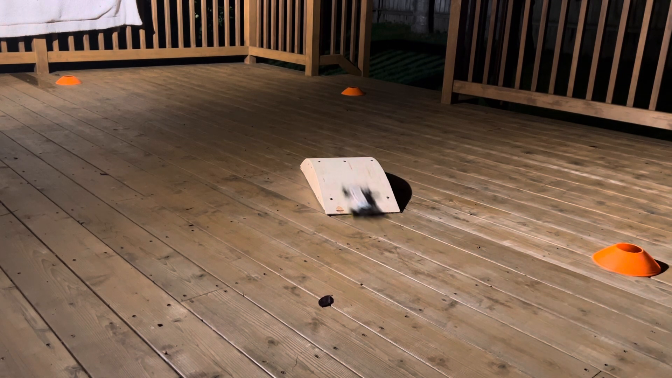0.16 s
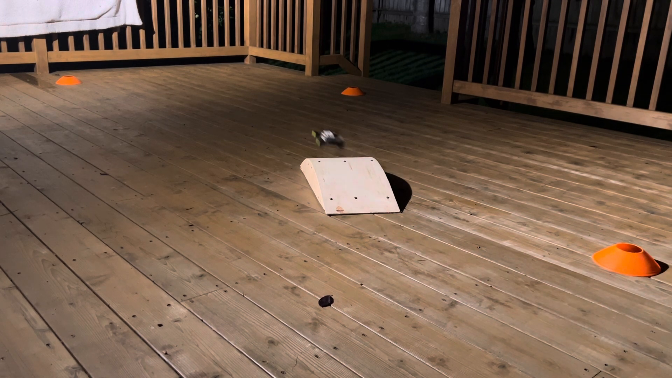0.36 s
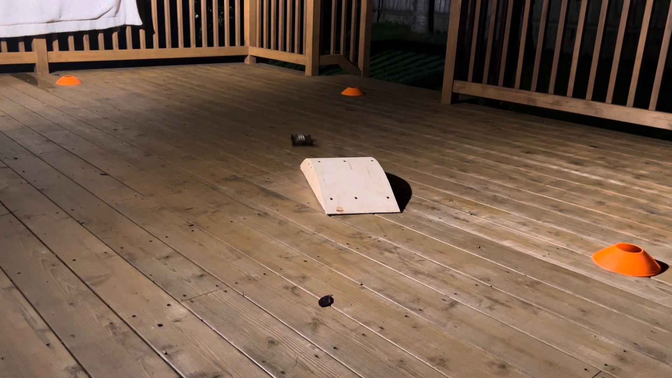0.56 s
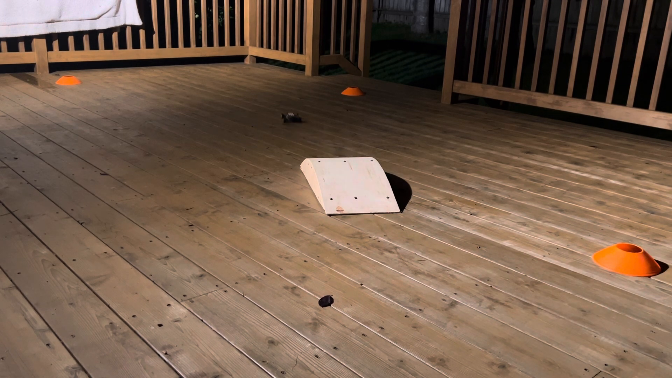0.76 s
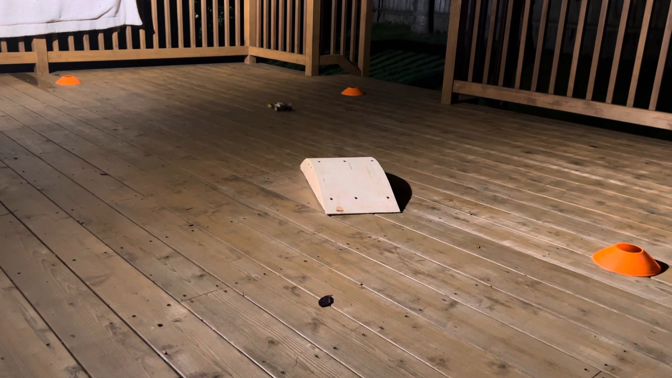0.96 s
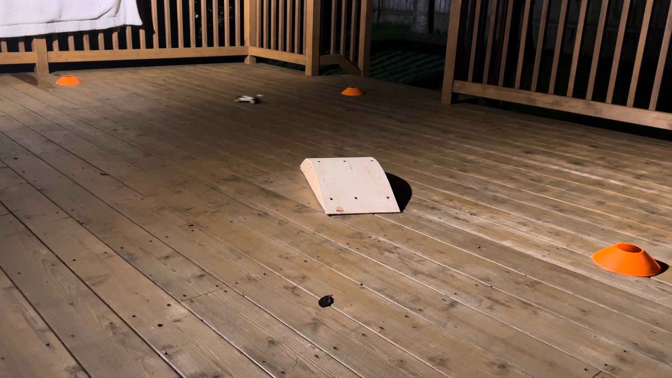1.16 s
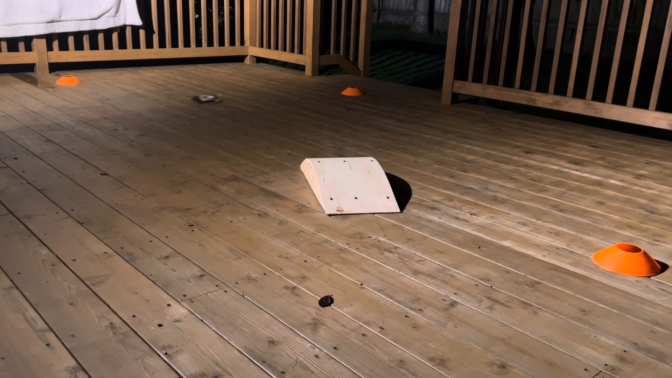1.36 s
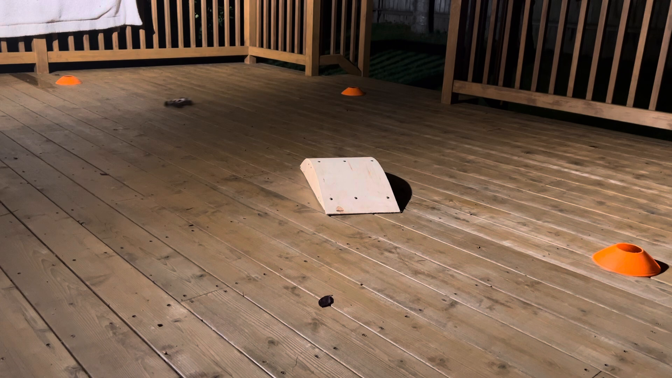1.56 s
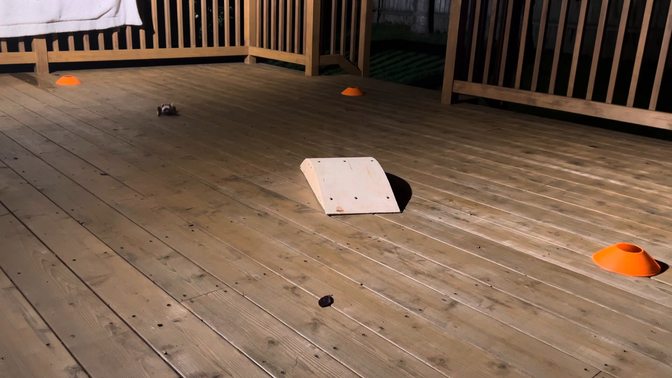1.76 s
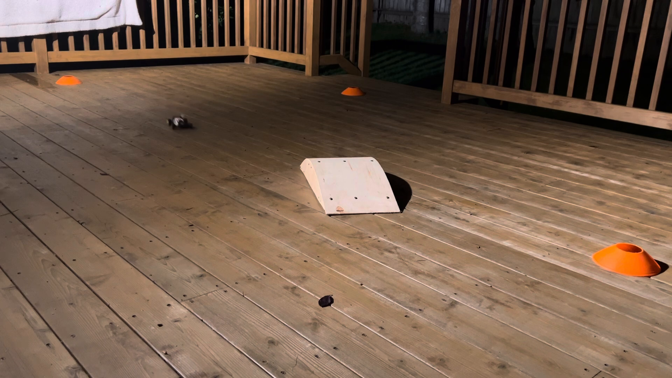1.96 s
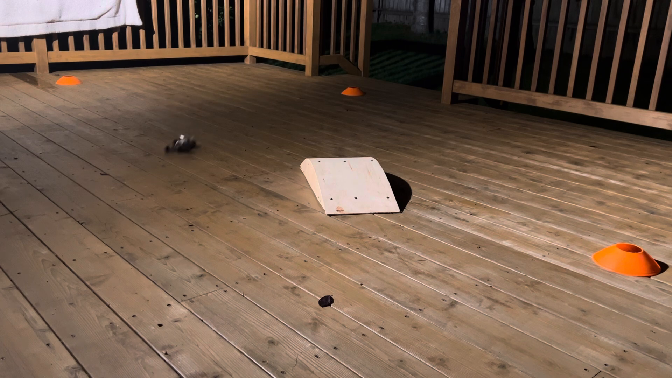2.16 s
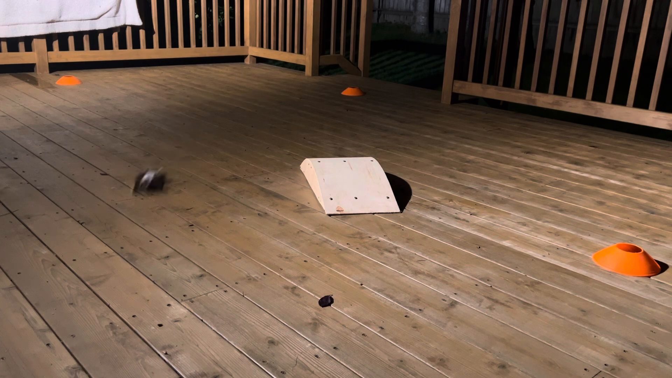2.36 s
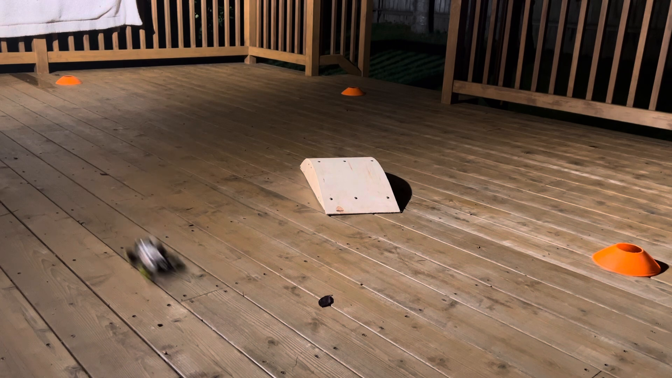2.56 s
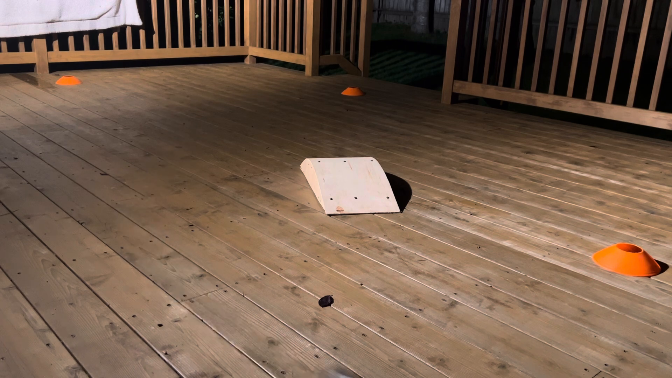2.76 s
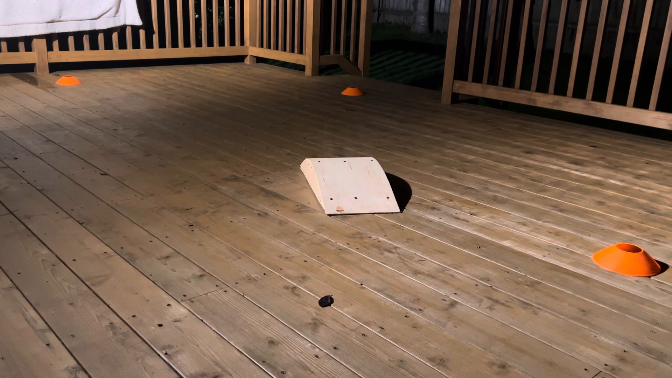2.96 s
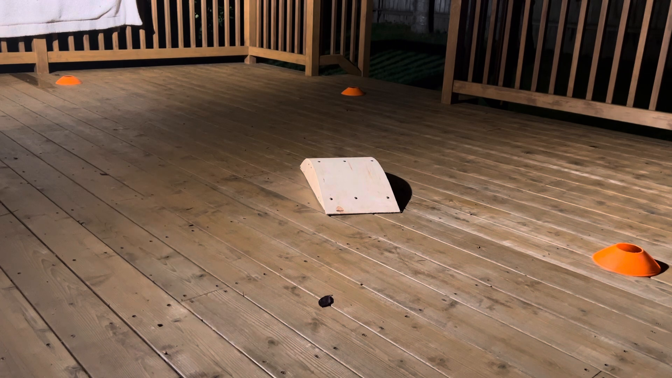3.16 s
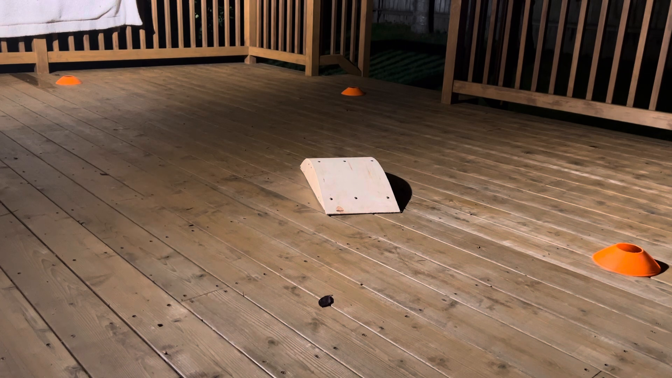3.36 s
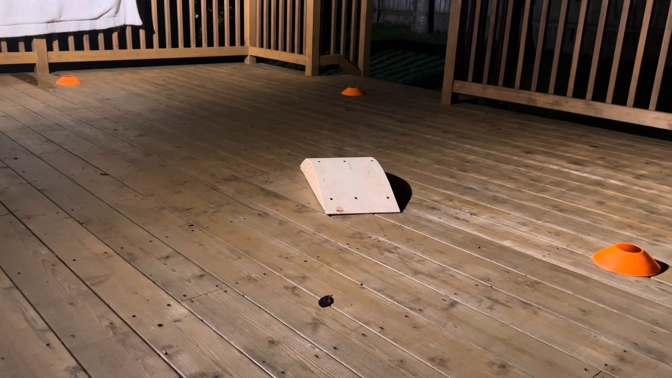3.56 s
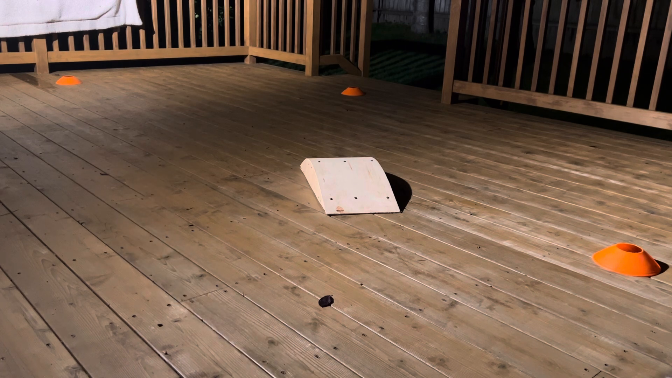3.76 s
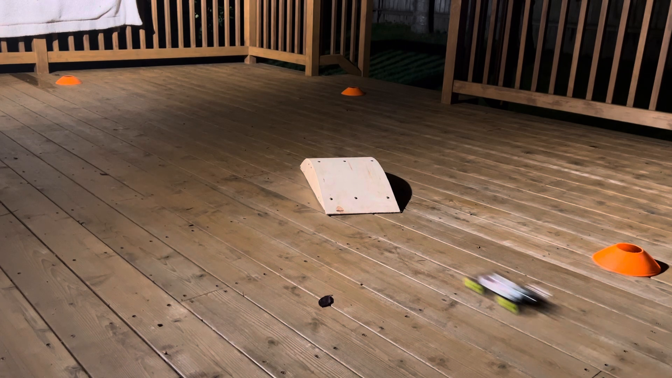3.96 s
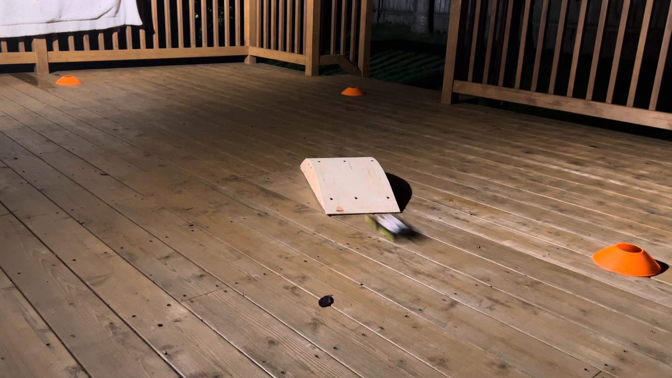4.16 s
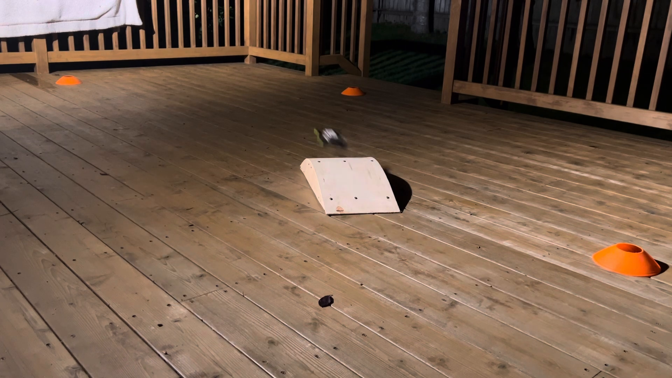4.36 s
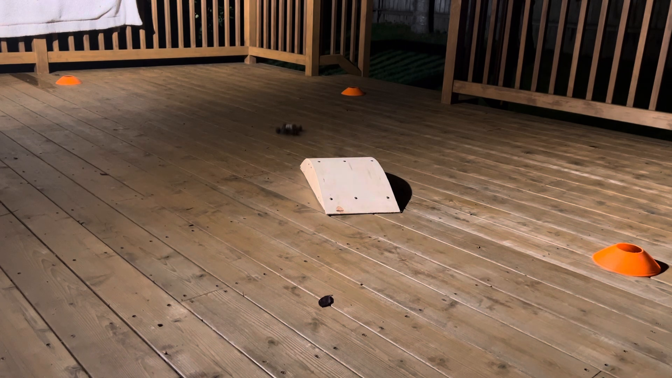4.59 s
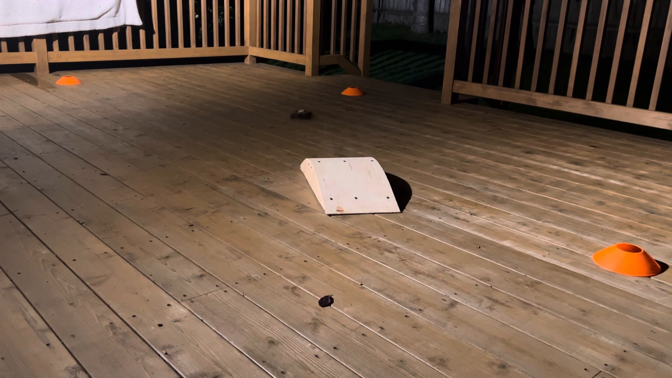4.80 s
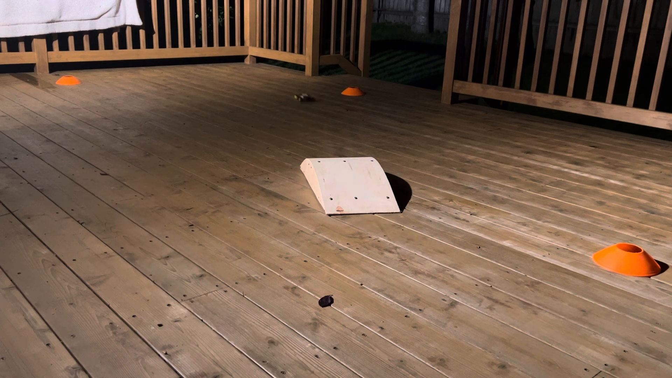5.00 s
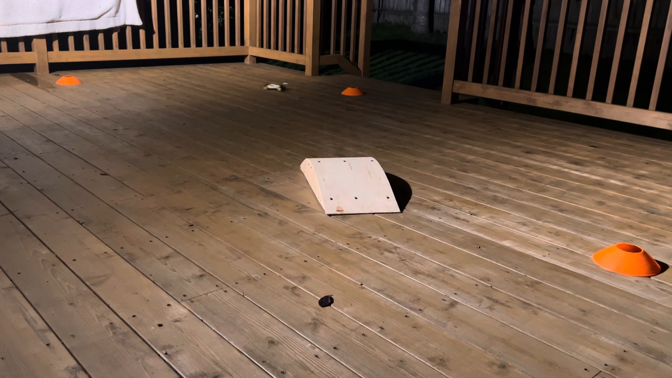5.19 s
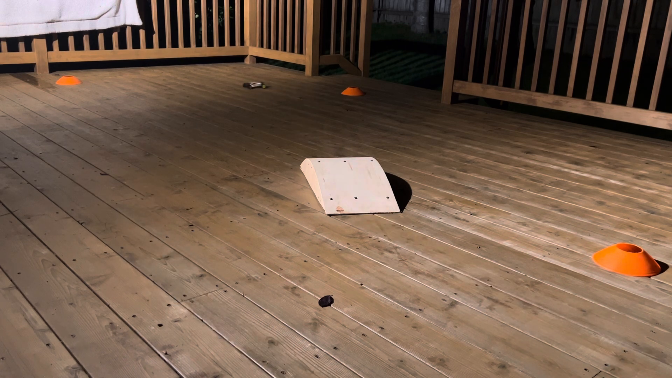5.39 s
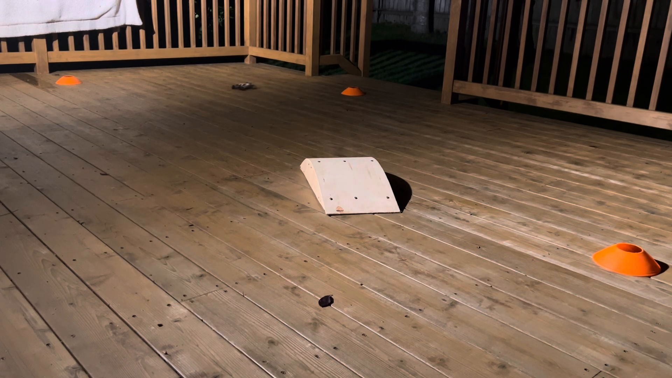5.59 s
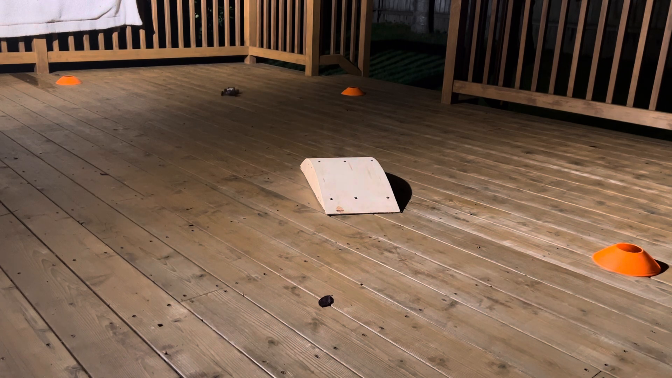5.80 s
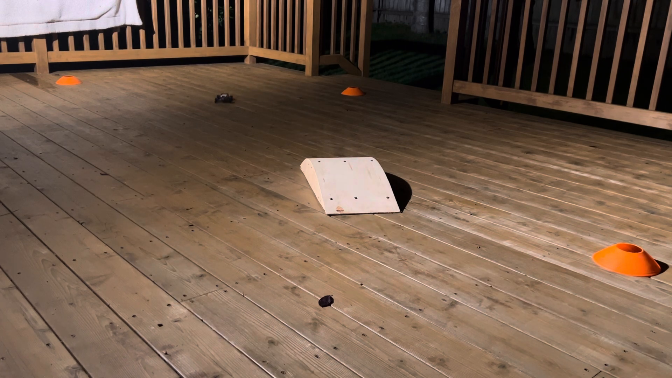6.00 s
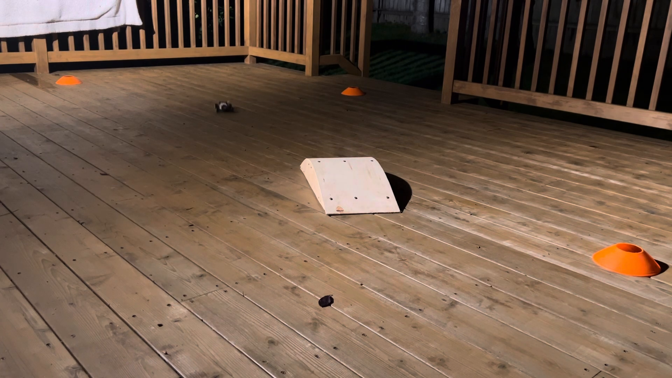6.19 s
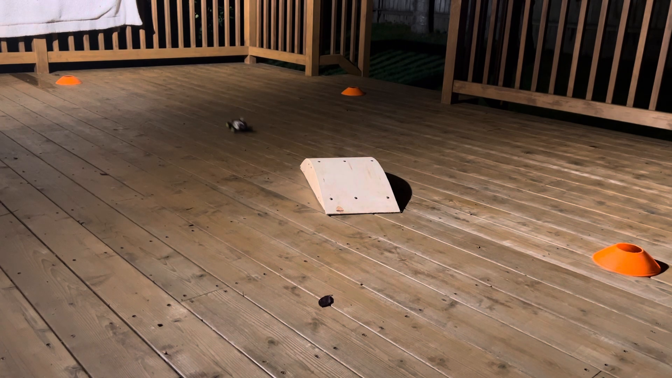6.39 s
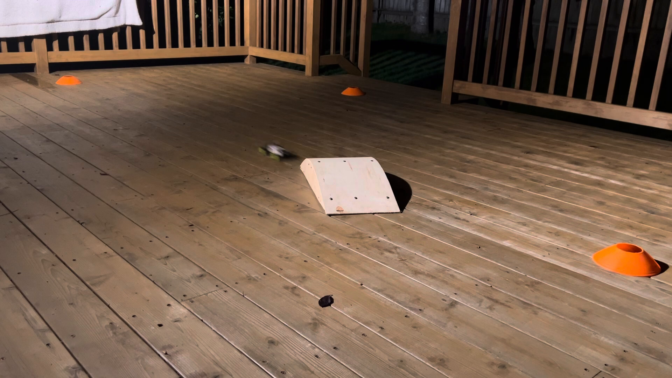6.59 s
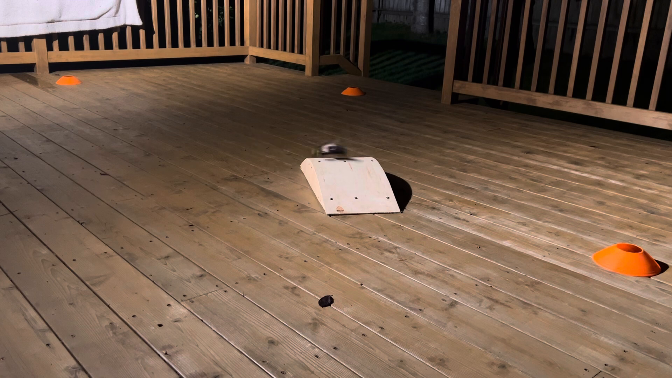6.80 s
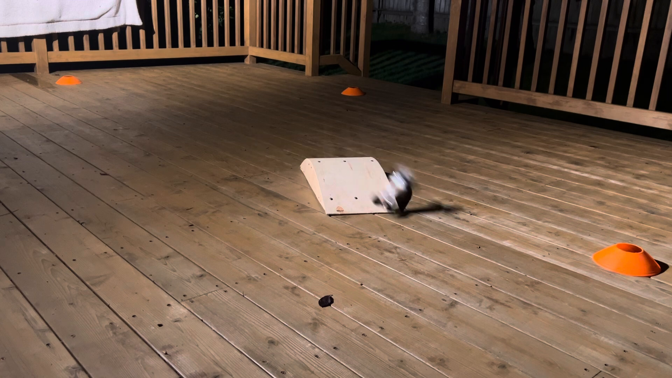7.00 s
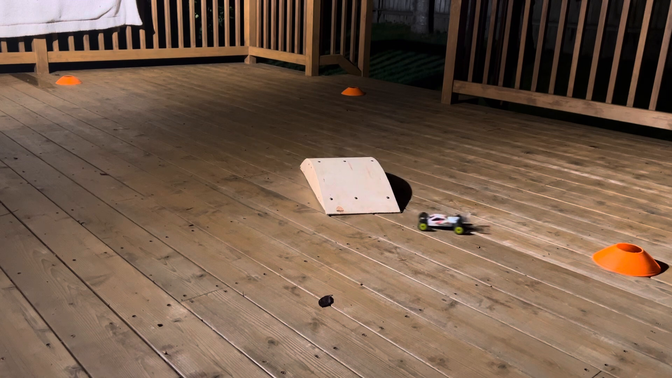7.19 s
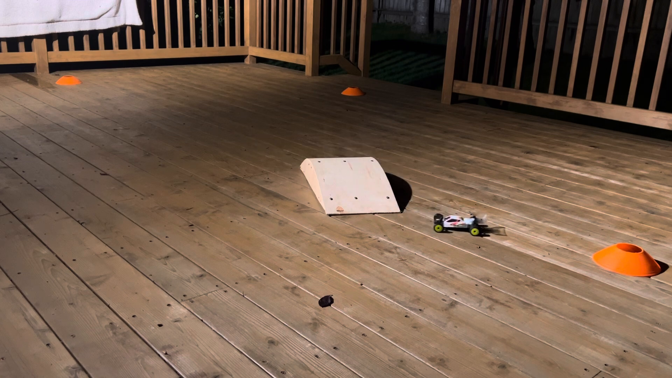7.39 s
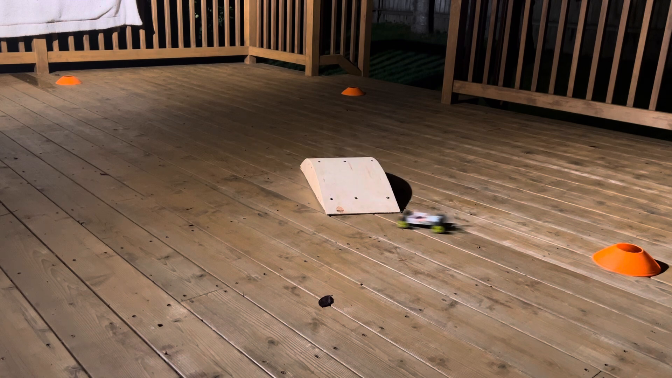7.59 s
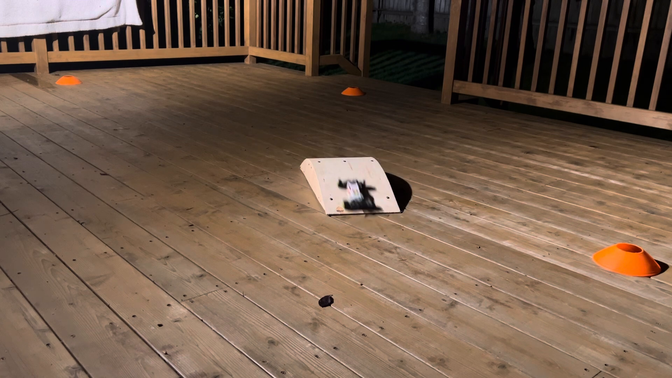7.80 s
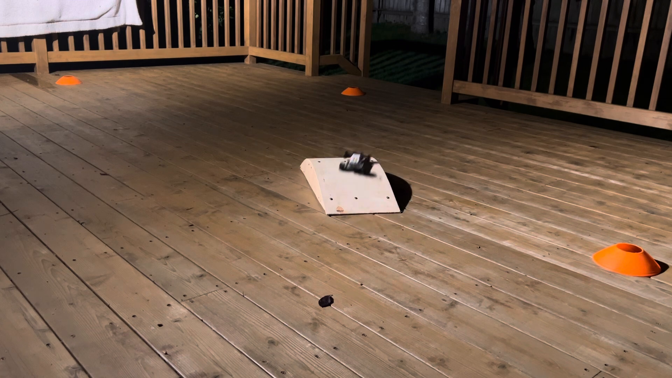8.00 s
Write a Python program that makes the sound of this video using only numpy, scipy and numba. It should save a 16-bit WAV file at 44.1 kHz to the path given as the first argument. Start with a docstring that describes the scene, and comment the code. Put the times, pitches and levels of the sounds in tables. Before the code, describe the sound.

A small electric toy buggy whines and rattles around a wooden deck, thumping over a plywood ramp, landing hard, then crashing and tumbling.

```python
"""Toy buggy on a wooden deck

A small electric buggy laps a deck outdoors: its gears whine and rattle with each burst of throttle, and its speed
controller sings at low throttle. It thumps up a plywood ramp, lands on the boards, later crashes into the ramp
and tumbles: modal wood, noise knocks and plastic cracks. A sprung handset control snaps back now and then.
Random decaying echoes stand for boards and railings; filtered noise is the outdoor rumble."""
import sys
import numpy as np
from scipy import signal
from scipy.fft import rfft, irfft, next_fast_len
from scipy.io import wavfile
from scipy.ndimage import map_coordinates
from numba import njit

SR = 44100
rng = np.random.default_rng(int(sys.argv[2]) if len(sys.argv) > 2 else 0)


def output_pcm(signal):
    """Save a mono or channel-first signal as 16-bit PCM at the path in sys.argv[1].

    Samples are clipped to [-1, 1] before scaling.
    """
    pcm = np.clip(np.atleast_2d(signal).T, -1, 1) * 32767
    wavfile.write(sys.argv[1], SR, np.round(pcm).astype(np.int16))


N = 355005
CRUISE_HZ = 1000  # reference tooth rate for the speed-dependent levels

# spectrum of loose gearbox parts: (frequency [Hz], relative level [dB])
RATTLE_SPECTRUM = [(900, -5.5), (2000, -5.5), (2500, -1), (3100, 6), (5500, 5.5), (8400, 3.5), (11500, 4),
                   (13500, 3), (15500, -7)]
# spectrum of the buzzing chassis: (frequency [Hz], relative level [dB])
CHASSIS_SPECTRUM = [(400, -66), (800, -0.5), (1150, 2), (1480, 13), (1750, 11), (2100, 8.5), (2600, 0.5),
                    (4000, -31)]


def amp(db):
    """Decibels to gain."""
    return 10 ** (np.asarray(db) / 20)


def unit(x):
    """Scale to rms 1."""
    return x / np.sqrt(np.mean(x ** 2) + 1e-20)


def along(points, hz):
    """Read (Hz, value) points on a log frequency axis."""
    f, v = np.transpose(points)
    return np.interp(np.log(hz + 1), np.log(f + 1), v)


def wobble(rate_hz):
    """A smooth random curve with rate_hz knots a second."""
    knots = rng.standard_normal(int(N * rate_hz / SR) + 4)
    return map_coordinates(knots, [np.arange(N) * rate_hz / SR])


def filtered(x, response):
    """Multiply the spectrum of x by a response of frequency."""
    n = x.shape[-1]
    m = next_fast_len(n + 8192)
    return irfft(rfft(x, m) * response(np.fft.rfftfreq(m, 1 / SR)), m)[..., :n]


def coloured(x, spectrum):
    """Shape x by a (Hz, dB) spectrum, at rms 1."""
    return unit(filtered(x, lambda hz: amp(along(spectrum, hz))))


def resonance(hz, centre_hz, width_hz):
    """Response of one resonance, 1 at its centre."""
    return 1j * hz * width_hz / (centre_hz ** 2 - hz ** 2 + 1j * hz * width_hz)


def add(track, s, sound):
    """Mix a sound into the track from time s."""
    part = track[max(round(s * SR), 0):][:len(sound)]
    part += sound[:len(part)]


@njit
def follow(goal, lag_s, start, rate, slip, slip_s):
    """Chase a goal with a varying time constant, slip_s while below both slip and goal."""
    out = np.empty(len(goal))
    for i in range(len(goal)):
        lag = slip_s if start < min(slip, goal[i]) else lag_s[i]
        start += (goal[i] - start) / (1 + lag * rate)
        out[i] = start
    return out


def throttle(coast_s=1, load_s=0.049, unload_s=0.065, slip_hz=620, slip_s=.012):
    """Each squeeze spins the motor up and loads the gears; in between it coasts or brakes."""
    # squeezes: (start [s], end [s], target tooth rate [Hz], spin-up time constant [s],
    # gearbox load [dB], chassis load [dB], whine load [dB])
    squeezes = [(0, 0.057, 1180, .04, -42, -45.5, -39), (.06, 0.269, 1964, 0.037, -42.5, -49, -37.5),
                (0.539, 0.829, 967, 0.039, -46, -55.5, -48.5), (.84, 1.138, 864, .17, -48.5, -54, -52),
                (1.25, 1.683, 917, 0.18, -45.5, -51, -43.5), (1.852, 2.584, 2115, 0.165, -42, -45.5, -38),
                (2.601, 2.895, 1350, 0.12, -45, -44.5, -51), (3.42, 3.6, 1020, .3, -39.5, -44.5, -42),
                (3.6, 3.78, 814, .05, -39.5, -47.5, -33), (3.78, 4.007, 3300, 1.4, -39.5, -43.5, -36.5),
                (4.007, 4.229, 2261, .11, -39.5, -44.5, -35), (4.656, 4.855, 1693, .07, -42.5, -47, -41),
                (5.495, 5.63, 860, 0.07, -38.5, -42, -41), (5.86, 6.512, 2850, 2.2, -41, -47.5, -39.5),
                (6.512, 6.659, 2150, .13, -38, -44.5, -33.5), (7.418, 7.455, 900, .15, -40, -42, -36),
                (7.455, 7.655, 900, .15, -33.5, -40.5, -28.5), (7.655, 7.77, 1100, .35, -33.5, -41, -35),
                (7.77, 8.049, 1650, 0.06, -35.5, -43, -41.5)]
    # braking or a hard landing slows the wheels: (start [s], end [s], time constant [s])
    stops = [(3.165, 3.417, .04), (4.591, 4.667, 0.34), (5.078, 5.491, 0.14), (5.678, 5.84, .17),
             (7.141, 7.422, 0.038)]
    t = np.arange(N) / SR
    # unloaded teeth are quieter: gearbox, chassis, whine [dB]
    coast_db = [-50, -53.5, -62]
    state = np.outer([0, coast_s, *coast_db, unload_s], np.ones(N))
    for start, end, *squeeze in squeezes:
        state[:, (t >= start) & (t < end)] = np.array([*squeeze, load_s])[:, None]
    goal_hz, inertia_s, *loads_db, response_s = state
    for start, end, halt_s in stops:
        inertia_s[(t >= start) & (t < end)] = halt_s
    # from rest the wheels spin loose and climb quickly to slip_hz
    tooth_hz = follow(goal_hz, inertia_s, float(CRUISE_HZ), SR, float(slip_hz), slip_s)
    loads = [follow(amp(db), response_s, float(amp(db[0])), SR, 0.0, 0.0) for db in loads_db]
    return tooth_hz, *loads


def drivetrain(tooth_hz, gearbox_load, chassis_load, whine_load, distance_m,
               lash=0.062, patchy_db=0.89, unsteady_db=1.5, flutter=.015, flutter_hz=110,
               gearbox_power=1, chassis_power=0.33, whine_power=0.3, rattle_db=-1.3, whine_db=-5.3):
    """Meshing teeth give a whine; loose teeth rattle the gearbox and the chassis."""
    # radiation of the tooth harmonics: (frequency [Hz], level [dB])
    radiation = [(600, -24), (1100, -3), (1450, 4), (1650, 6), (2000, 2), (2450, -5), (3100, 2), (4400, -2),
                 (5800, 0), (8200, 4.5), (12000, -10)]
    # tooth harmonics: (multiple of the tooth rate, level [dB], phase blur [rad])
    harmonics = [(1, 0, .27), (2, 0, .38), (3, 0, .48), (4, 0, .52), (5, -10, 1.2), (6, -1, 1.3),
                 (8, -5, 1.6)]
    pinion_teeth, play_hz, uneven_db = 12, 420, 4
    hard_hz, hard_db_per_octave = 1700, 5

    # board gaps tug at the wheels
    tugged_hz = tooth_hz * (1 + flutter * wobble(flutter_hz))
    phase = 2 * np.pi * np.cumsum(tugged_hz) / SR
    # slow teeth meet softly, which weakens the multiples above the second
    soft_db = hard_db_per_octave * np.log2(np.minimum((tooth_hz + 1) / hard_hz, 1))
    whine = np.zeros(N)
    for k, db, blur in harmonics:
        level_db = db + along(radiation, k * tooth_hz) + soft_db * (k > 2) + uneven_db * wobble(flutter_hz)
        # play between the teeth blurs the higher multiples
        whine += amp(level_db) * np.sin(k * phase + blur * wobble(play_hz))

    # an off-centre pinion presses harder once a turn
    eccentricity = 1 + lash * np.sin(phase / pinion_teeth)
    pressure = eccentricity * amp(patchy_db * wobble(50) + unsteady_db * wobble(14))
    noise = rng.standard_normal(N) * amp(1.3 * wobble(900))
    speed = tooth_hz / CRUISE_HZ
    gearbox = gearbox_load * speed ** gearbox_power * coloured(noise, RATTLE_SPECTRUM)
    chassis = chassis_load * speed ** chassis_power * coloured(noise, CHASSIS_SPECTRUM)
    mesh = whine_load * speed ** whine_power * unit(whine)
    return pressure * (amp(rattle_db) * (gearbox + chassis) + amp(whine_db) * mesh) / distance_m


def controller(chop_hz=990.5, fade_s=0.0099):
    """The chopped motor current makes the windings sing at a fixed pitch."""
    # part throttle: (start [s], end [s], level [dB])
    spells = [(1.293, 1.723, -68.5), (3.395, 3.543, -58), (5.473, 5.533, -63), (7.367, 7.437, -60.5)]
    # harmonics of the chopping: (multiple, relative level [dB])
    harmonics = [(2, 0), (3, -8), (4, -6), (5, -13), (6, -17), (7, -17)]
    t = np.arange(N) / SR
    level = sum(amp(db) * np.clip(np.minimum(t - start, end - t) / fade_s, 0, 1)
                for start, end, db in spells)
    tone = sum(amp(db + 2.2 * wobble(30)) * np.sin(2 * np.pi * k * chop_hz * t) for k, db in harmonics)
    return level * unit(tone)


def growl(start_s=5.562, level_db=-47, pitch_hz=1310, rise_hz_per_s=2600, length_s=0.039, blur_rad=1.5):
    """Pulling away from rest, the straining gears give a rough, rising growl."""
    t = np.arange(N) / SR - start_s  # start_s is the loudest moment
    phase = 2 * np.pi * (pitch_hz * t + rise_hz_per_s * t ** 2 / 2) + blur_rad * wobble(450)
    return amp(level_db + 5.1 * wobble(200)) * np.exp(-(t / length_s) ** 2) * np.sin(phase)


def tyres(tooth_hz, distance_m, bumps_db=3, drum_db=-52, drum_power=0.29, drum_spread=0.79,
          tread_db=-60, tread_power=1.1):
    """Wheels drum over the board gaps, louder when fast and near, and the tread slaps at speed."""
    # drumming: (frequency [Hz], relative level [dB])
    drum_spectrum = [(25, 2), (70, 15.5), (130, 4), (330, 5.5), (500, -6.5), (900, -0.5), (1800, -29)]
    # tread slapping the wood: (frequency [Hz], relative level [dB])
    tread_spectrum = [(200, -17), (450, 2.5), (650, 1), (900, -15.5), (1500, -19)]
    speed = tooth_hz / CRUISE_HZ
    jolts = rng.standard_normal(N) * amp(bumps_db * wobble(35))
    # the boards carry the drumming, so it fades less with distance
    drum_level = amp(drum_db) * speed ** drum_power / distance_m ** drum_spread
    tread_level = amp(tread_db) * speed ** tread_power / distance_m
    return drum_level * coloured(jolts, drum_spectrum) + tread_level * coloured(jolts, tread_spectrum)


def skids(judder_db=3.0):
    """Tyres scrub sideways, and each skid swells and fades as a judder of chassis and gearbox."""
    # tight turns: (centre [s], half-width to 1/e^2 [s], chassis level [dB], gearbox level [dB])
    turns = [(3.039, 0.042, -44, -51), (3.099, 0.11, -50, -54.5)]
    t = np.arange(N) / SR
    scrub = rng.standard_normal(N) * amp(judder_db * wobble(150))
    chassis, gearbox = coloured(scrub, CHASSIS_SPECTRUM), coloured(scrub, RATTLE_SPECTRUM)
    return sum(np.exp(-2 * ((t - s) / width_s) ** 2)
               * (amp(chassis_db) * chassis + amp(gearbox_db) * gearbox)
               for s, width_s, chassis_db, gearbox_db in turns)


def squeak(centre_s=7.784, level_db=-41, pitch_hz=2450, fall_hz_per_s=16000, length_s=0.026, rough=0.064):
    """A tyre catches the ramp's lip: rubber sticks and slips in one short, rough, falling chirp."""
    t = np.arange(N) / SR - centre_s
    hz = (pitch_hz - fall_hz_per_s * t) * (1 + rough * wobble(900))
    return amp(level_db) * np.exp(-(t / length_s) ** 2) * np.sin(2 * np.pi * np.cumsum(hz) / SR)


def plastic(crack_t60=0.018, shake_db=-15, shake_t60=0.22, crest_db=3, panel_db=11, panel_width_hz=900):
    """Sharp cracks ring the struck panel and shake the whole body shell."""
    # hard contacts: (time [s], nominal peak [dB], panel pitch [Hz])
    contacts = [(0.5489, -32, 3820), (3.028, -36, 1800), (4.594, -27.5, 1980), (6.6731, -20, 6900),
                (6.682, -24, 3500), (6.713, -18.5, 7000), (7.001, -37, 4030), (7.0486, -25, 3040),
                (7.06, -31, 6360), (7.136, -41.5, 4530), (7.792, -28, 2900)]
    shell = [(700, -48), (1700, 1.5), (2300, 5.5), (3800, 2.0), (5800, 0.0), (9000, -4.0), (15000, -11.0)]  # (Hz, dB)
    track, t = np.zeros(N), np.arange(SR // 2) / SR
    for s, db, panel_hz in contacts:
        shake = coloured(rng.standard_normal(len(t)), shell)
        crack = unit(filtered(shake, lambda hz: 1 + amp(panel_db) * resonance(hz, panel_hz, panel_width_hz)))
        body = crack * amp(-60 * t / crack_t60) + shake * amp(shake_db - 60 * t / shake_t60)
        add(track, s, amp(db - crest_db) * body)
    return track


def blows(hits, modes, t60, rise_s, tail_db, tail_t60, detune, crest_db=23, clatter_db=0.5):
    """Each blow rings the wood's main modes and a crowd of brief ones, dulled by a low-pass."""
    # the crowd of brief modes: (frequency [Hz], relative level [dB])
    boards = [(30, -33.5), (65, -3), (200, -1), (330, 8), (700, -3.5), (1300, -4.5), (2400, -15),
              (5000, -23), (15000, -3.5)]
    track, t = np.zeros(N), np.arange(SR * 3 // 4) / SR
    knots_s = t[::SR // 160]
    for s, db, bright_hz, ring_db in hits:
        ring = np.zeros(len(t))
        for hz, level_db, life_s in modes:
            # each blow rings at slightly different pitches
            spot_hz = hz * (1 + detune * rng.normal())
            decay = amp(level_db + rng.normal(0, 2.5) - 60 * t / life_s)
            ring += decay * np.sin(2 * np.pi * (spot_hz * t + rng.random()))
        # loose parts clatter unevenly while the shock spreads through the joists and lingers there
        uneven = np.interp(t, knots_s, rng.standard_normal(len(knots_s)))
        clatter = rng.standard_normal(len(t)) * amp(clatter_db * uneven)
        crowd = coloured(clatter, boards) * (amp(-60 * t / t60) + amp(tail_db - 60 * t / tail_t60))
        knock = (amp(ring_db) * unit(ring) + unit(crowd)) * (1 - np.exp(-t / rise_s))
        knock = signal.lfilter(*signal.butter(2, min(bright_hz, SR / 4), fs=SR), knock)
        add(track, s, amp(db - crest_db) * unit(knock))
    return track


def ramp():
    """Blows make the plywood ramp ring."""
    # blows: (time [s], nominal peak [dB], contact low-pass [Hz], ring level [dB])
    hits = [(.154, -11, 836, -7.5), (.196, -11.5, 706, -6.5), (4.188, -8, 980, -4.5),
            (4.222, -5.5, 1020, -1), (6.672, -9, 1783, -17), (6.712, -3, 2250, -8), (7.718, -27, 335, -4),
            (7.799, -24, 527, -11.5)]
    # resonances: (frequency [Hz], level [dB], t60 [s])
    modes = [(124.2, -14, 0.25), (323.3, 1, 0.18), (323, -32, 0.99), (345.4, -2, 0.14), (388.7, -5.5, 0.14),
             (451, 0, 0.066), (566.4, 1, 0.073), (841, -9, 0.14), (1012, -7, 0.082)]
    return blows(hits, modes, t60=0.073, rise_s=0.012, tail_db=-18.0, tail_t60=0.31, detune=0.0084)


def deck(bump_hz=430, bump_ring_db=-12):
    """Wheels land on the boards one after another or drop into gaps, and the deck rings."""
    # landings: (time [s], nominal peak [dB], contact low-pass [Hz], ring level [dB])
    landings = [(.519, -23, 538, -4), (.548, -13.5, 980, -6), (.561, -17.5, 1080, -8),
                (1.422, -39.5, 503, -10), (4.559, -24, 570, -5), (4.591, -13.5, 920, -11.5),
                (4.604, -16, 2040, -18), (7, -26, 675, -25), (7.046, -25, 1395, -7), (7.06, -19, 980, -10)]
    # soft rubber dropping into board gaps: (time [s], nominal peak [dB])
    bumps = [(4.949, -43), (5.04, -41)]
    # resonances: (frequency [Hz], level [dB], t60 [s])
    modes = [(155.7, 0.5, 0.31), (190.7, -6.5, 0.4), (278, -7, 0.5), (351, -16, 0.82), (379, 9.5, 0.17),
             (450, -6, 0.31), (624, 3.5, 0.12), (829, 5.5, 0.084)]
    hits = list(landings) + [(s, db, bump_hz, bump_ring_db) for s, db in bumps]
    return blows(hits, modes, t60=0.093, rise_s=0.0036, tail_db=-27.0, tail_t60=0.67, detune=0.0391)


def joists(swing_hz=73, t60=1.5, thud_db=5, thud_t60=0.66):
    """Heavy blows swing the deck on its joists: a dull thud and a slow low ring."""
    # heavy blows: (time [s], level [dB])
    swings = [(6.713, -31.5), (7.06, -40), (7.802, -45.5)]
    thud_spectrum = [(30, -3.5), (60, 14.0), (150, 12.0), (300, -42)]  # (Hz, dB)
    track, t = np.zeros(N), np.arange(SR * 3 // 2) / SR
    for s, db in swings:
        ring = np.sin(2 * np.pi * swing_hz * t) * amp(-60 * t / t60)
        thud = coloured(rng.standard_normal(len(t)), thud_spectrum) * amp(thud_db - 60 * t / thud_t60)
        add(track, s, amp(db) * (ring + thud) * (1 - np.exp(-t / 0.0029)))
    return track


def knocks(t60=0.043, rise_s=.0012, width_hz=650, crest_db=6):
    """The bare chassis meets the wood with a short, hollow knock."""
    # chassis strikes: (time [s], nominal peak [dB], pitch [Hz])
    strikes = [(.5505, -17.5, 830), (6.675, -9, 1200), (6.715, -5.5, 1160), (7.0615, -15, 860)]
    track, t = np.zeros(N), np.arange(SR // 5) / SR
    for s, db, centre_hz in strikes:
        noise = rng.standard_normal(len(t))
        knock = unit(filtered(noise, lambda hz: resonance(hz, centre_hz, width_hz) ** 2))
        add(track, s, amp(db - crest_db - 60 * t / t60) * (1 - np.exp(-t / rise_s)) * knock)
    return track


def snaps(flight_s=0.018, shrink=.82, bounce_db=-11, loss_db=1.2, t60=.024,
          tick_db=0, tick_t60=.034, spring_db=-19, spring_t60=1.0):
    """A sprung handset control snaps back and bounces ever faster, ringing its case as the spring rasps."""
    # releases: (time [s], level [dB])
    releases = [(1.7443, -36), (3.3052, -38), (5.7345, -35)]
    # case modes: (frequency [Hz], relative level [dB])
    case_modes = [(2300, 1.5), (2750, 2), (4200, -3), (5050, 1)]
    track, t = np.zeros(N), np.arange(SR // 2) / SR
    hiss = lambda: coloured(rng.standard_normal(len(t)), RATTLE_SPECTRUM)
    for s, db in releases:
        add(track, s, amp(db + spring_db - 60 * t / spring_t60) * hiss())
        for k in range(8):
            ring = unit(sum(amp(level_db) * np.sin(2 * np.pi * (hz * (1 + 0.064 * rng.normal()) * t + rng.random()))
                            for hz, level_db in case_modes))
            contact = ring * amp(-60 * t / t60) + hiss() * amp(tick_db - 60 * t / tick_t60)
            weaker_db = (bounce_db + 2 * rng.normal()) * (k > 0) - loss_db * k
            bounce_s = s + flight_s * np.sum(shrink ** np.arange(k))
            add(track, bounce_s, amp(db + weaker_db) * contact)
    return track


def echoes(near_db, far_db, near_t60=0.036):
    """Boards and posts scatter the sound at once; railings and house wall answer a little longer."""
    # decay of the longer answer: (frequency [Hz], t60 [s])
    railings = [(100, 0.69), (400, 0.46), (2000, 0.088), (12000, 0.006)]
    hz, t, z = signal.stft(rng.standard_normal((2, SR // 3)), SR, nperseg=256)
    answer = 0
    for db, t60 in [(near_db, near_t60), (far_db, along(railings, hz)[:, None])]:
        tail = signal.istft(z * amp(-60 * t / t60), SR, nperseg=256)[1]
        answer = answer + amp(db) * tail / np.linalg.norm(tail[0])
    return answer


def surroundings(x, near_db, far_db):
    """The direct sound plus echoes that crossfade to a new random pattern every 0.2 s."""
    left, right = np.zeros((2, N))
    hop = SR // 5
    fade = np.sqrt(np.hanning(2 * hop))
    for start in range(0, N, hop):
        piece = x[start:start + 2 * hop]
        for track, answer in zip((left, right), echoes(near_db, far_db)):
            add(track, start / SR, signal.fftconvolve(piece * fade[:len(piece)], answer))
    # long waves reach both ports alike and pass between the posts; the treble comes mostly direct
    side = filtered((left - right) / 2, lambda hz: (hz / np.hypot(hz, 370)) ** 2 / np.hypot(1, (hz / 6500) ** 2))
    mid = filtered((left + right) / 2, lambda hz: amp(-1.0) * hz / np.hypot(hz, 1200))
    return np.array([x + mid + side, x + mid - side])


def air(level_db=-56, side_db=-12):
    """Distant outdoor rumble, nearly alike in both ears."""
    # rumble: (frequency [Hz], relative level [dB])
    rumble = [(24, -50), (40, 5.5), (62, 2.5), (90, 5), (250, -12), (600, -19.5), (1600, -23.5),
              (3000, -30.5), (15000, -59)]
    mid, side = coloured(rng.standard_normal((2, N)), rumble)
    return amp(level_db) * np.array([mid + amp(side_db) * side, mid - amp(side_db) * side])


def scene():
    """The buggy, its knocks on the wood, the handset and the outdoor air."""
    # two laps, out over the ramp and back: (time [s], distance [m])
    path = [(0, 1.68), (.22, 1.6), (.45, 3.23), (1, 3.17), (1.5, 5), (2, 3.5), (2.55, 1.55), (2.8, 1.53),
            (3.3, 1.98), (4, 2.95), (4.22, 1.74), (4.5, 2.77), (5.3, 3), (5.9, 4.66), (6.35, 3.36),
            (6.7, 3.84), (7.2, 2.24), (8.05, 2.58)]
    path_s, path_m = np.transpose(path)
    distance_m = np.maximum(np.interp(np.arange(N) / SR, path_s, path_m), .5)
    tooth_hz, *loads = throttle()
    buggy = drivetrain(tooth_hz, *loads, distance_m) + controller() + growl()
    buggy += tyres(tooth_hz, distance_m) + skids() + squeak() + plastic()
    wood = ramp() + deck() + joists() + knocks()
    balance = amp([[.3], [-.3]])  # slightly left
    near_sound = balance * surroundings(buggy + snaps(), near_db=-13.0, far_db=-4.0)
    return near_sound + surroundings(wood, near_db=0.5, far_db=-22.5) + air()


def record(dry, top_hz=15300):
    """The two microphone ports fall out of step in the treble; then a band limit."""
    # lag of the left port: (frequency [Hz], lag [turns])
    port_lag = [(7400, 0), (8700, .22), (9400, .46), (10400, .54), (12200, 1), (13700, 1), (15300, 1.5)]
    # half the lag on each side
    lag = lambda hz: np.exp(-1j * np.pi * along(port_lag, hz) * np.array([[1], [-1]]))
    return filtered(dry, lambda hz: lag(hz) * (hz < top_hz))


dry = scene()
out = record(dry)
output_pcm(out)
```